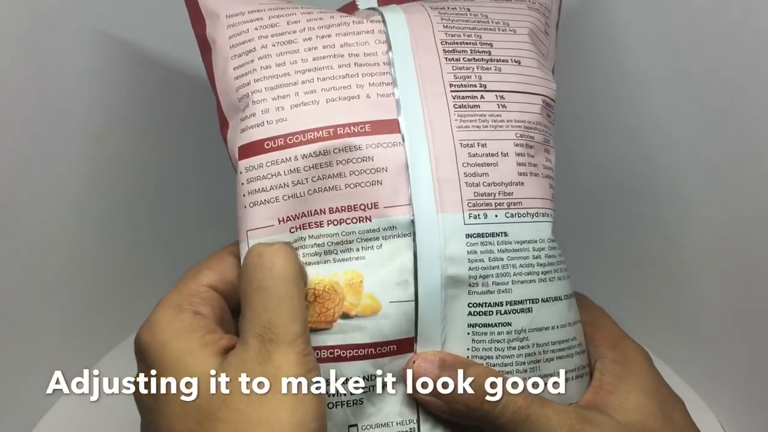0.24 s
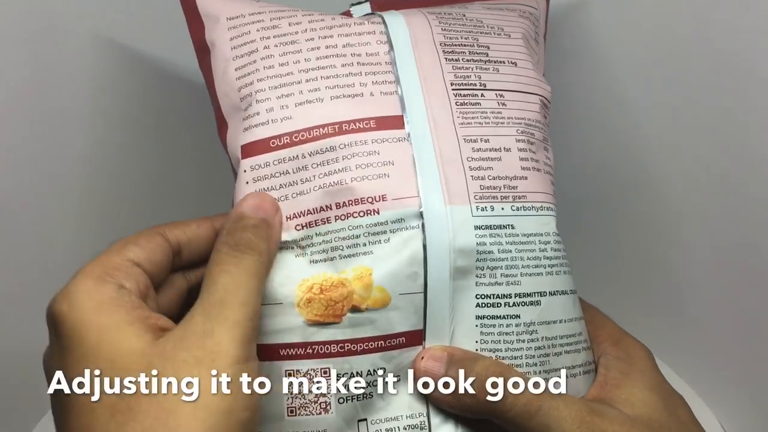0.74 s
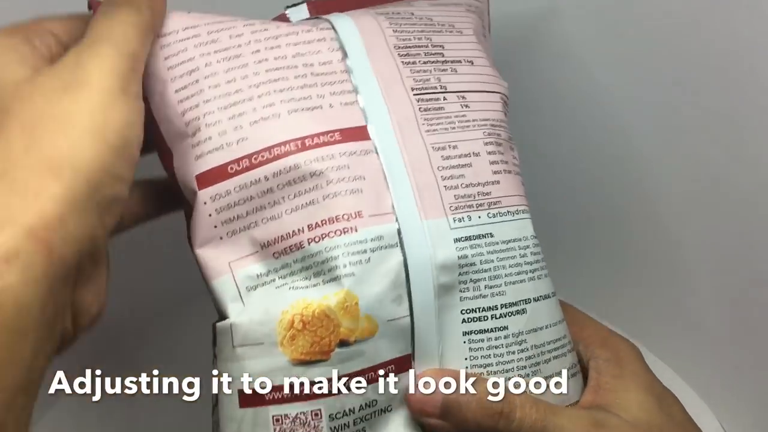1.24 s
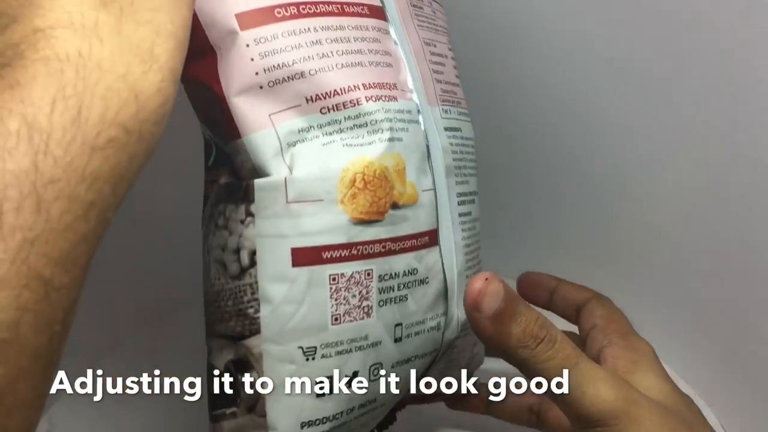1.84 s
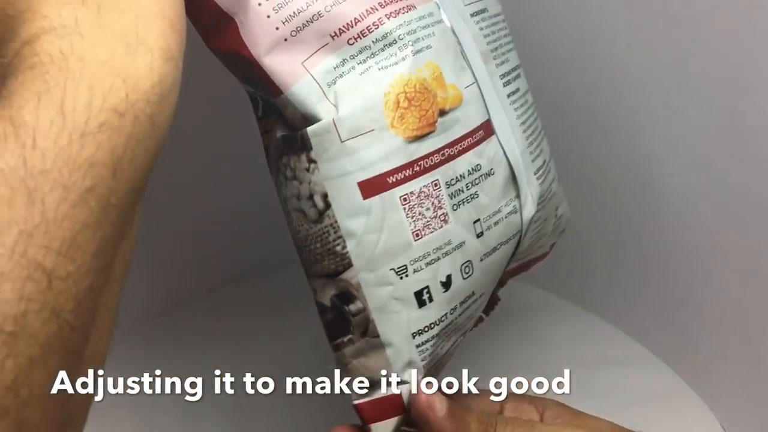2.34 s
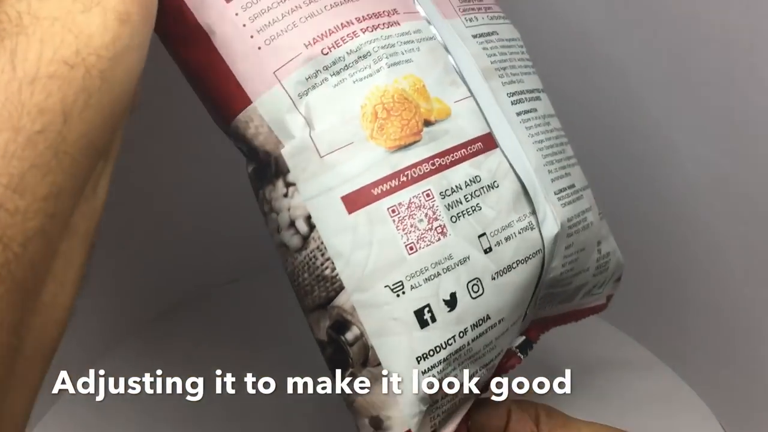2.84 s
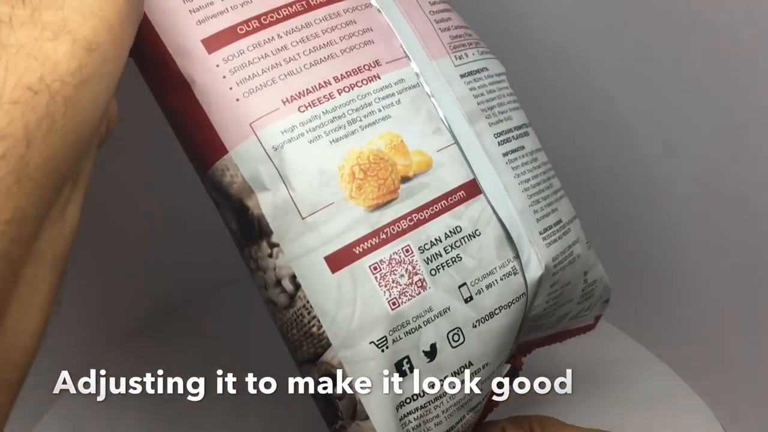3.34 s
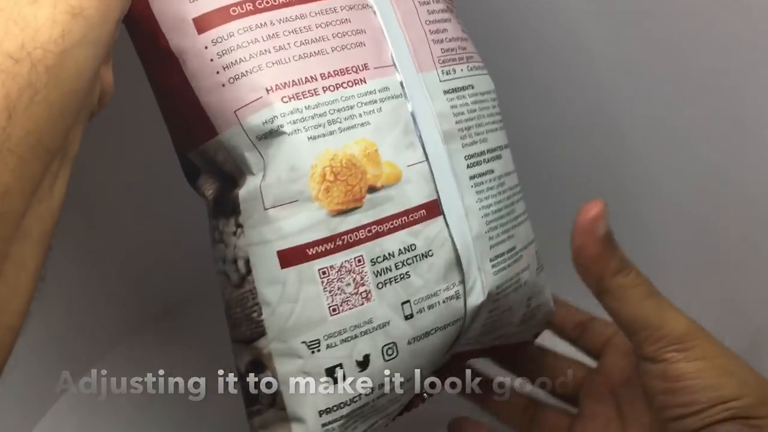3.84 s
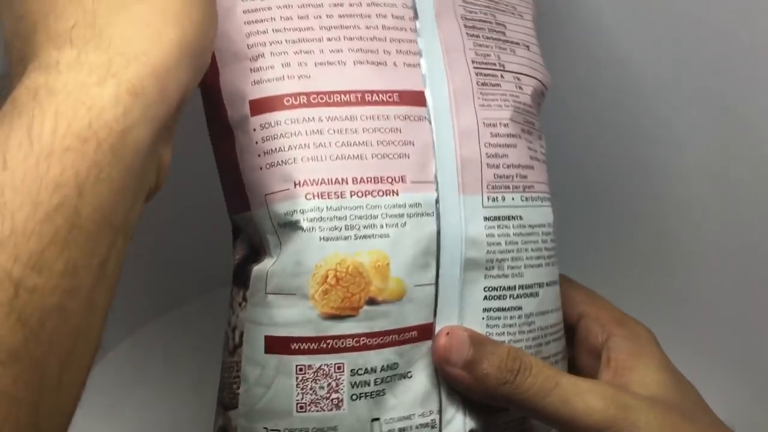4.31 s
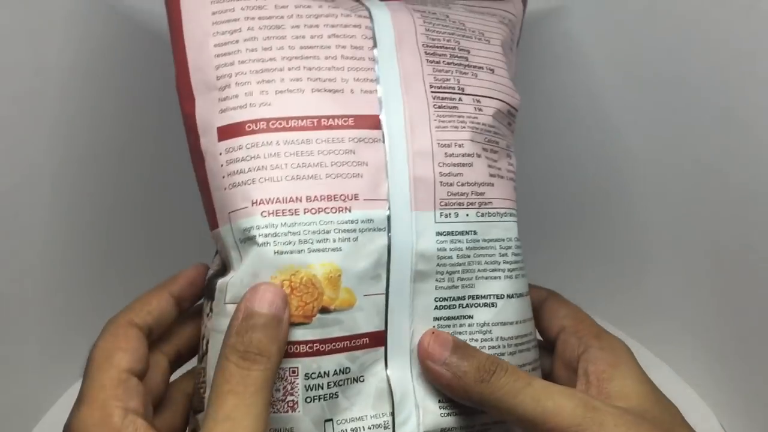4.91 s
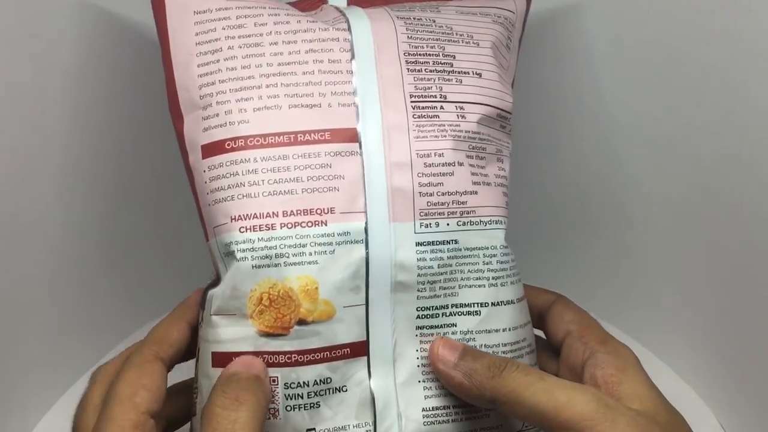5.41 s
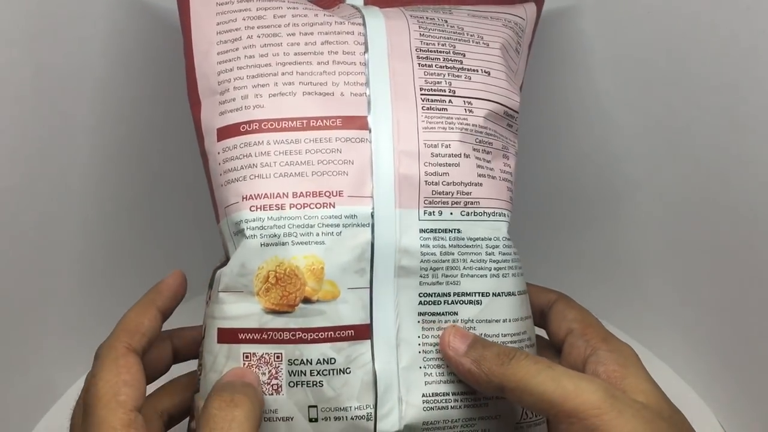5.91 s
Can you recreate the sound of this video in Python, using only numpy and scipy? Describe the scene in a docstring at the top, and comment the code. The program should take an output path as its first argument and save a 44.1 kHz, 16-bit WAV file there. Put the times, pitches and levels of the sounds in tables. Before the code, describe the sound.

A sealed, air-filled plastic snack bag is handled close by in a small room, with a faint low hum underneath and a short echo after each snap. From the start, fingers slide over the plastic with a soft hiss and creases buckle in irregular bright ticks, cracks and hollow pops. A sharper cluster comes around 0.8 seconds, with popcorn shifting dully inside. More scattered crinkles follow from 1.3 to 1.9 seconds, then a brief lull. Between 2.6 and 3.1 seconds, snaps and dull pops crowd together as the contents slide and the bag bounces softly on its trapped air. A few separate cracks fall between 3.5 and 3.9 seconds. The loudest fold gives way at about 4.5 seconds, a sharp crack with a low, hollow thump. The handling then thins to light rubbing and a few soft pops, the last near 5.9 seconds.

```python
"""A sealed, air-filled snack bag is turned and straightened by hand in a small room, over a low hum.
First fingers slide over the film, popcorn shifts inside and creases buckle: each gives a bright tick,
a crack of the film and a hollow pop on the cushion of air, and the room rings on. Scattered snaps and
dull flips of the panels crowd together near 3 s. The loudest fold gives way at 4.5 s and bounces the
whole bag; then the handling thins out to a few soft pops."""
import sys
import numpy as np
from scipy import signal
from scipy.fft import rfft, irfft
from scipy.io import wavfile

SR = 44100
rng = np.random.default_rng(int(sys.argv[2]) if len(sys.argv) > 2 else 0)


def unload_audio(sound):
    """Save the sound as a 16-bit wav file, at the path given as the first command line argument."""
    columns = np.transpose(np.atleast_2d(sound))
    # keep every value between -1 and 1, then stretch to whole-number steps
    steps = np.round(np.clip(columns, -1, 1) * 32767)
    wavfile.write(sys.argv[1], SR, steps.astype(np.int16))


N = 271656
BURST_GAIN = np.sqrt(SR / 100)  # gives a unit-energy burst the energy of 10 ms at rms 1


def amp(db):
    """The decibel law: amplitude grows tenfold every 20 dB."""
    return 10 ** (np.asarray(db) / 20)


def curve_at(points, hz):
    """Interpolation of (frequency, value) points along a logarithmic frequency axis."""
    point_hz, value = np.transpose(points)
    return np.interp(np.log(hz + 1), np.log(point_hz + 1), value)


def colour(x, spectrum, size=2048):
    """Minimum-phase filtering: the Hilbert transform of the log gain gives a causal phase."""
    log_gain = np.log(amp(curve_at(spectrum, abs(np.fft.fftfreq(size, 1 / SR)))))
    response = np.exp(np.conj(signal.hilbert(log_gain)))
    taps = np.fft.ifft(response).real[:size // 2]
    return signal.fftconvolve(x, taps)[:len(x)]


def unit(x):
    """Normalisation to an energy of 1."""
    return x / np.sqrt(np.sum(x ** 2) + 1e-20)


def add(mix, start_s, sound):
    """Superposition: a two-channel sound joins the mix at start_s."""
    part = mix[:, max(round(start_s * SR), 0):][:, :sound.shape[1]]
    part += sound[:, :part.shape[1]]


def panned(x, pan_db):
    """A level difference between the ears leans a sound to the left (+) or right (-)."""
    return x * amp([[pan_db / 2], [-pan_db / 2]])


# Stereo width, as the gain of the side signal: frequency_hz, gain_db
SIDE_GAIN = [(60, -7.5), (300, -16), (700, -11), (1300, -6), (2500, -3.5), (4500, -4), (7000, -5),
             (10000, -11.5), (15000, -19)]
def stereo(mid, side):
    """Mid-side stereo: sum and difference give left and right, widest in the middle treble."""
    side = colour(side, SIDE_GAIN)
    return np.array([mid + side, mid - side])


# Noise spectrum of the still room: frequency_hz, density_db
AIR_SPECTRUM = [(20, -4), (45, 0.5), (65, -1.5), (95, 3), (180, -6.5), (350, -15.5), (700, -20),
                (1500, -25), (3000, -31.5), (6000, -33), (13000, -39.5), (16000, -59)]
def background(air_db=-66, hum_hz=61.7, hum_db=-64):
    """Stationary sound: the broadband noise of room air and the pure tone of a low hum."""
    shape = amp(curve_at(AIR_SPECTRUM, np.fft.rfftfreq(N, 1 / SR)))
    noises = [np.sqrt(N) * unit(irfft(rfft(rng.standard_normal(N)) * shape, N)) for _ in range(2)]
    hum = np.sqrt(2) * np.sin(2 * np.pi * (hum_hz * np.arange(N) / SR + rng.random()))
    return amp(air_db) * stereo(*noises) + amp(hum_db) * hum


# Time the room takes to die away by 60 dB: frequency_hz, t60_s
REVERB_TIMES = [(150, 0.87), (500, 0.44), (1500, 0.44), (4000, 0.42), (9000, 0.34), (15000, 0.37)]
# Colour of the room's tail: frequency_hz, gain_db
REVERB_SPECTRUM = [(100, -11), (170, 3.5), (300, -3.5), (600, -1.5), (850, -7.5), (1400, -2), (3000, -3.5),
                   (6000, -6), (10000, -10), (15000, -13.5)]
def reverberation(x, late_frames=2, size=512, hop=128):
    """A diffuse field: energy spreads to nearby pitches, decays band by band and returns as noise."""
    frames = dict(fs=SR, nperseg=size, noverlap=size - hop)
    hz, _, spectra = signal.stft(x, **frames)
    near = np.exp(-((hz[:, None] - hz) / (.02 * hz[:, None] + 20)) ** 2)
    power = (near / near.sum(1)[:, None]) @ abs(spectra) ** 2
    retained = 1e-6 ** (hop / SR / curve_at(REVERB_TIMES, hz))  # share of power left after a frame
    stored = np.array([signal.lfilter([0] * late_frames + [1 - share], [1, -share], band)
                       for share, band in zip(retained, power)])
    level = np.sqrt(stored) * amp(curve_at(REVERB_SPECTRUM, hz))[:, None]
    noise = signal.stft(rng.standard_normal((2, N)), **frames)[2]
    tails = signal.istft(noise / noise.std() * level, **frames)[1]
    return stereo(*tails[:, :N])


# First echoes from the table and near walls: delay_s, gain
REFLECTIONS = [(.0031, -0.056), (.0047, 0.031), (.0066, -0.071), (0.0109, -.12), (0.0147, -0.031)]
def room(x, wet_db=-3):
    """Reflection: early echoes and a diffuse tail follow the direct sound."""
    out = x + amp(wet_db) * reverberation(x.mean(0))
    for delay_s, gain in REFLECTIONS:
        add(out, delay_s, gain * x[::-1])  # left and right change places
    return out


def gestures(rows, attack_s, release_s, rest_db, arch_db=3):
    """Powers add: movements that swell to their middle and die away sum over a resting level."""
    t = np.arange(0, N, 64) / SR
    power = amp(rest_db) ** 2
    for start, length, level_db in rows:
        arch = np.interp(t, [start, start + length / 2, start + length], [0, 1, 0]) - .5
        onset = np.clip((t - start) / attack_s, 0, 1)
        release = np.exp(-np.maximum(t - start - length, 0) / release_s)
        power += (amp(level_db + arch_db * arch) * onset * release) ** 2
    return np.interp(np.arange(N) / SR, t, np.sqrt(power))


def contacts(per_s, spectrum, spread_db, smooth):
    """Shot noise: tiny impacts of random time and size over a smooth rub, at rms 1."""
    impulses = (rng.random(N) < per_s / SR) * rng.choice([-1, 1], N)
    sizes = amp(spread_db * np.minimum(rng.exponential(1, N), 3.5))
    rub = smooth * unit(rng.standard_normal(N))
    return np.sqrt(N) * unit(colour(unit(impulses * sizes) + rub, spectrum))


# Tilts of the bag that slide the popcorn: start_s, length_s, relative_level_db
BAG_TILTS = [(0, 0.22, -61), (.86, .1, -51), (1.64, 0.1, -49.5), (2.6, 0.042, -48.5), (2.82, 0.047, -44),
             (3.5, 0.33, -56.5), (4.35, 0.11, -53), (4.85, 0.59, -65)]
# Knocks heard through the bag: frequency_hz, density_db
POPCORN_SPECTRUM = [(70, -35), (130, -3.5), (320, 6), (600, -3), (1200, -8), (2200, -12.5), (5000, -21.5),
                    (12000, -54)]
def popcorn(gain_db=-3):
    """Impact noise: light pieces knock on the film, dulled by the bag and never quite at rest."""
    stir = gestures(BAG_TILTS, attack_s=.04, release_s=0.064, rest_db=-72)
    knocks = [contacts(130, POPCORN_SPECTRUM, spread_db=3.0, smooth=0.94) for _ in range(2)]
    return amp(gain_db) * stir * stereo(*knocks)


# Slides of a finger over the film: start_s, length_s, level_db
FINGER_STROKES = [(0, .22, -59), (.33, .15, -61), (.61, .3, -66), (.95, 0.088, -59.5), (1.245, 0.25, -62.5),
                  (1.62, 0.27, -66.5), (2.54, 0.16, -65.5), (2.8, 0.59, -77), (3.54, 0.16, -69.5),
                  (3.81, 0.053, -59.5), (4.21, 0.15, -69.5), (4.35, 0.12, -65), (4.7, 0.12, -67.5),
                  (4.87, 0.14, -66), (5.28, 0.29, -70.5)]
# Hiss of skin on film: frequency_hz, density_db
FRICTION_SPECTRUM = [(200, -20), (600, 6.5), (1500, 2.5), (3000, -0.5), (5500, -4.5), (8000, -2),
                     (10500, 0), (13000, -5.5), (16000, -15.5)]
def fingers(catch_db=1.0, catch_per_s=20):
    """Sliding friction: skin hisses and catches unevenly; even a resting grip rubs faintly."""
    rub = gestures(FINGER_STROKES, attack_s=0.0067, release_s=0.059, rest_db=-80)
    catches = rng.standard_normal(400)
    unevenness = np.interp(np.arange(N) / SR * catch_per_s, np.arange(len(catches)), catches)
    hiss = [contacts(4300, FRICTION_SPECTRUM, spread_db=4.0, smooth=3.6) for _ in range(2)]
    return rub * amp(catch_db * unevenness) * stereo(*hiss)


# Bounces of the whole bag as large folds give way: start_s, level_db, pitch_hz, decay_s
AIR_BOUNCES = [(0.765, -44, 283, 0.017), (0.868, -52.5, 290.5, 0.0096), (.872, -40, 543, .005),
               (2.893, -44, 190, 0.044), (2.946, -45, 174, 0.034), (4.425, -47.5, 227, 0.018),
               (4.486, -37.5, 324, .008), (4.491, -40.5, 177.5, 0.054), (4.495, -44, 116, .06),
               (5.903, -53.5, 181, 0.038)]
def air_cushion(rise_s=.003):
    """A damped mass and spring: the bag bounces softly on its trapped air."""
    out, t = np.zeros((2, N)), np.arange(SR // 4) / SR
    for start_s, level_db, pitch_hz, decay_s in AIR_BOUNCES:
        envelope = (1 - np.exp(-t / rise_s)) * np.exp(-t / decay_s)
        bounce = unit(np.sin(2 * np.pi * pitch_hz * t) * envelope)
        add(out, start_s, amp(level_db) * BURST_GAIN * bounce[None])
    return out


def slips(t, decay_s, spread, rise_s):
    """Stick-slip motion: film gives way in a quick, dying run of tiny slips of uneven size."""
    sizes = rng.standard_normal(len(t)) * np.exp(spread * rng.standard_normal(len(t)))
    return np.clip(sizes, -6, 6) * (1 - np.exp(-t / rise_s)) * np.exp(-t / decay_s)


# Modes of the taut panel: pitch_ratio, level_db, decay_s
PANEL_MODES = [(0.548, -6.5, 0.009), (1.001, 13.5, 0.0017), (1.55, -9.5, 0.0069), (2.201, -29, 0.00049)]
# Flutter of the wrinkles round a pop: pitch_ratio, density_db
WRINKLE_SPECTRUM = [(.12, -24), (.3, -8.5), (.6, 4.5), (1.35, -1.5), (2.2, -6.5), (3.8, -32.5), (9.0, -60)]
def pop(t, pitch_hz, softness, rise_s=0.0013, flutter=0.81):
    """Modal vibration: a flipped panel rings briefly on the air inside while its wrinkles flutter."""
    octave_db = 6 * (1 - softness)  # a sharp fold drives the upper modes harder
    ring = np.zeros(len(t))
    for ratio, level_db, decay_s in PANEL_MODES:
        mode_hz = pitch_hz * ratio * rng.uniform(0.927, 1.05)
        gain = amp(level_db + octave_db * np.log2(ratio))
        ring += gain * np.exp(-t / decay_s) * np.sin(2 * np.pi * mode_hz * t)
    ring *= 1 - np.exp(-(t / rise_s) ** 2)
    spectrum = [(pitch_hz * ratio, db + octave_db * np.log2(ratio)) for ratio, db in WRINKLE_SPECTRUM]
    wrinkles = colour(slips(t, decay_s=0.0053, spread=0.33, rise_s=0.00062), spectrum)
    return unit(unit(ring) + flutter * unit(wrinkles))


# Colour of the film's crack: pitch_ratio, sharp_fold_db, soft_fold_db
CRACK_SPECTRUM = [(.25, -20.5, -33), (.48, -1, -5.5), (.7, 3, -5.5), (1.0, -0.5, -1.5), (1.35, -2, -9),
                  (1.8, -3, -18), (2.6, -13, -24), (5.0, -39, -40), (10.0, -52.5, -71.5)]
def crack(t, pitch_hz, snap_s, softness, ring_gain=0.69, ring_rise_s=0.00078, ring_decay_s=0.0036):
    """Snap-through: a facet of film turns over in slips; the softer the fold, the purer it rings."""
    spectrum = [(pitch_hz * ratio, (1 - softness) * sharp_db + softness * soft_db)
                for ratio, sharp_db, soft_db in CRACK_SPECTRUM]
    facet_hz = pitch_hz * rng.uniform(0.94, 0.99)
    ring = np.sin(2 * np.pi * facet_hz * t) * (1 - np.exp(-t / ring_rise_s)) * np.exp(-t / ring_decay_s)
    crackle = colour(slips(t, decay_s=2.3 * snap_s, spread=0.4, rise_s=0.00063), spectrum)
    return unit(unit(crackle) + ring_gain * softness * unit(ring))


# Tick at the tip of a crease: frequency_hz, density_db
TICK_SPECTRUM = [(2500, -31), (4200, -9.5), (5500, -5), (7500, -4.5), (10000, -3), (12000, -5.5),
                 (15000, -18.5), (17000, -25)]
def tick(t, snap_s, first_jump=0.18):
    """Impulsive excitation: the tip of a crease jumps once, sharply, then stutters to rest."""
    jumps = unit(slips(t, decay_s=1.7 * snap_s, spread=0.25, rise_s=0.00039))
    jumps[3] += first_jump
    return unit(colour(jumps, TICK_SPECTRUM))


def buckle(pop_db, pop_hz, crack_db, crack_hz, tick_db, snap_s):
    """Buckling frees elastic energy as a pop, a crack and a tick; returns mid and side signals."""
    t = np.arange(2200) / SR
    softness = np.clip((crack_db - tick_db) / 28, 0, 1)  # a rounded fold has hardly any tick
    panel = amp(pop_db) * signal.hilbert(pop(t, pop_hz, softness))
    mid_side = [part + amp(crack_db) * crack(t, crack_hz, snap_s, softness)
                + amp(tick_db) * tick(t, snap_s)
                for part in (panel.real, panel.imag)]  # the pop reaches left and right out of step
    return BURST_GAIN * np.array(mid_side)


# Panels that flip with no sharp fold: start_s, level_db, pitch_hz
PANEL_FLIPS = [(.3108, -49.5, 350), (.3428, -51, 363), (.3915, -46, 718), (.433, -54.5, 550),
               (.5993, -50, 643), (.5862, -55.5, 416), (.7952, -44.5, 367), (1.5437, -52, 475),
               (1.7158, -43.5, 490), (1.9665, -55.5, 312), (2.8313, -43.5, 387), (2.8771, -38, 535),
               (2.8912, -37, 520), (2.9115, -38, 670), (2.955, -41, 518), (3.0444, -42, 341),
               (3.0787, -43.5, 440), (3.217, -56.5, 622), (3.3179, -56.5, 503), (3.469, -52.5, 530),
               (3.6022, -51, 583), (4.232, -54, 374), (4.8473, -50.5, 420), (4.984, -47, 625),
               (5.047, -51.5, 618), (5.082, -52.5, 540), (5.1368, -52.5, 478), (5.5362, -49.5, 396),
               (5.8187, -60.5, 850)]
def panels(faint_per_s=3.9, faint_db=-62.5, low_hz=340, high_hz=750):
    """Bistability: panels flip with a dull pop and a slight rustle; faint flips fall at random."""
    out = np.zeros((2, N))
    draws = rng.random((round(faint_per_s * N / SR), 2))
    faint = [(when * N / SR, faint_db, low_hz * (high_hz / low_hz) ** pitch) for when, pitch in draws]
    for start_s, level_db, pitch_hz in list(PANEL_FLIPS) + faint:
        flip = buckle(level_db, pitch_hz, crack_db=level_db - 13.5, crack_hz=1590,
                      tick_db=level_db - 34.5, snap_s=0.0055)
        add(out, start_s, flip)
    return panned(stereo(*out), pan_db=-2.5)


# Creases that buckle: start_s, pop_db, pop_hz, crack_db, crack_hz, tick_db
CREASE_SNAPS = [(0.0361, -38.5, 653, -38.5, 1730, -40.5), (0.153, -40.5, 820, -42.5, 2280, -42.5),
                (.172, -41.5, 400, -47, 2050, -58), (.2095, -41, 806, -51, 1510, -67),
                (0.5027, -44.5, 655, -48.5, 1780, -82), (0.5188, -42.5, 414, -53.5, 2740, -66),
                (0.7639, -35, 553, -44.5, 1900, -71), (.781, -41, 730, -37, 2430, -42.5),
                (.863, -35, 690, -36.5, 3300, -33), (.8664, -36.5, 752, -33.5, 2300, -31),
                (1.332, -46.5, 570, -44.5, 1910, -72), (1.445, -57.5, 490, -75, 2380, -55.5),
                (1.4529, -42, 1020, -42.5, 1280, -70), (1.6071, -47.5, 1140, -51.5, 1415, -73),
                (1.6829, -41.5, 556, -41.5, 1760, -57.5), (1.746, -42.5, 650, -41, 1920, -47),
                (1.7864, -39.5, 920, -43, 1790, -56), (1.8996, -48.5, 720, -43, 2540, -40.5),
                (2.1724, -49, 525, -43.5, 2090, -79), (2.3978, -63, 1105, -59, 1204, -100),
                (2.621, -48.5, 480, -49, 1820, -66), (2.642, -48, 743, -43, 2170, -43.5),
                (2.6733, -46, 432, -46.5, 2060, -77), (2.72, -37.5, 687, -34, 1920, -37),
                (2.7763, -50.5, 450, -46.5, 2350, -56), (2.8413, -40, 640, -39.5, 2280, -43.5),
                (2.861, -48, 400, -46, 2220, -49), (2.945, -35, 500, -40, 1350, -70),
                (3.0217, -40, 604, -42.5, 2380, -48), (3.064, -43.5, 660, -46.5, 1310, -66),
                (3.07, -44, 413, -46, 2020, -56.5), (3.246, -65, 500, -82, 2500, -66),
                (3.5053, -45, 650, -38.5, 2286, -42), (3.6592, -39.5, 546, -36.5, 2130, -41.5),
                (3.7217, -46, 648, -46, 1480, -80), (3.7633, -47, 600, -46.5, 3020, -55),
                (3.861, -51.5, 825, -49, 1810, -58.5), (4.2949, -48.5, 510, -58.5, 1730, -68.5),
                (4.3821, -46.5, 580, -50, 1500, -66), (4.3956, -40.5, 693, -44, 1720, -58.5),
                (4.423, -36, 450, -45, 1400, -76), (4.4832, -29, 520, -29, 1840, -28),
                (4.858, -70, 330, -82, 2900, -56.5), (4.886, -54, 374, -53.5, 1390, -86),
                (4.971, -53, 335, -57.5, 2040, -65.5), (5.3037, -56, 340, -63.5, 1675, -73),
                (5.8628, -47, 958, -47.5, 1435, -85), (5.8999, -45, 350, -48, 1470, -80.5)]
def creases(usual_snap_s=.0023, usual_db=-42.5, halving_db=21):
    """Elastic instability: each crease gives way suddenly, and a harder snap is over sooner."""
    out = np.zeros((2, N))
    for start_s, pop_db, pop_hz, crack_db, crack_hz, tick_db in CREASE_SNAPS:
        excess_db = max(max(crack_db, tick_db) - usual_db, 0)
        snap_s = usual_snap_s * 2 ** (-excess_db / halving_db)
        add(out, start_s, buckle(pop_db, pop_hz, crack_db, crack_hz, tick_db, snap_s))
    return panned(stereo(*out), pan_db=-2.5)


# Level difference between the ears: frequency_hz, left_minus_right_db
EAR_BALANCE = [(60, -6), (150, 2), (330, -1), (500, -1.5), (770, -13), (1170, -2), (1790, 0), (2740, -2.5),
               (4200, -1), (6400, 0), (15000, 0)]
# Resonances of the bag and the corner it stands in: frequency_hz, gain_db
BAG_RESONANCES = [(110, -2), (140, -1), (185, 2), (245, -2), (320, 5), (430, 1.5), (680, 1.5), (870, -2),
                  (1020, 0), (1200, 2.5), (1400, -1), (2200, -0.5), (4500, 0.5), (10000, -1)]
def scene():
    """Source and filter: all the bag's sounds share its resonances and lean a little to the right."""
    left, right = room(creases() + air_cushion() + popcorn() + panels()) + fingers()
    lean = np.array(EAR_BALANCE)
    ears = colour(left, lean * [1, .5]), colour(right, lean * [1, -.5])  # half the difference each
    return np.array([colour(ear, BAG_RESONANCES) for ear in ears]) + background()


def record(dry, cutoff_hz=16300):
    """Band limiting: a linear-phase low-pass filter removes the highest treble."""
    taps = signal.firwin(255, cutoff_hz, window=("kaiser", 8), fs=SR)
    return signal.oaconvolve(dry, taps[None], "same")


dry = scene()
out = record(dry)
unload_audio(out)
```